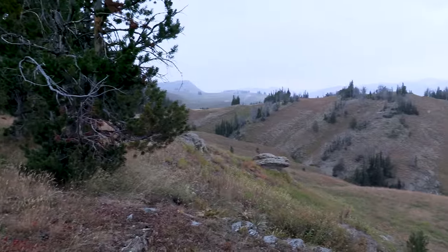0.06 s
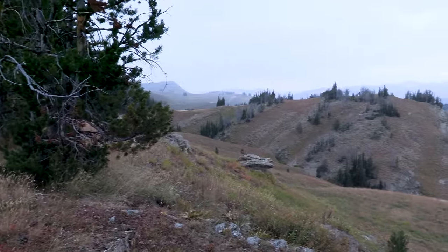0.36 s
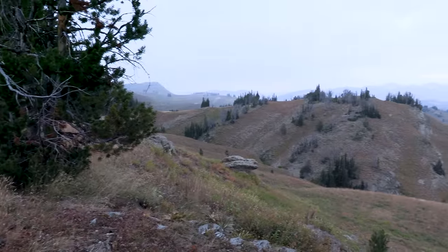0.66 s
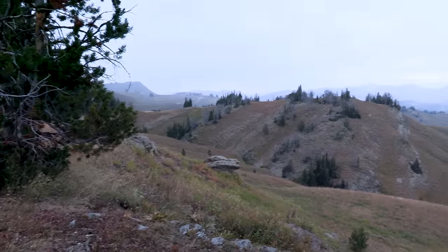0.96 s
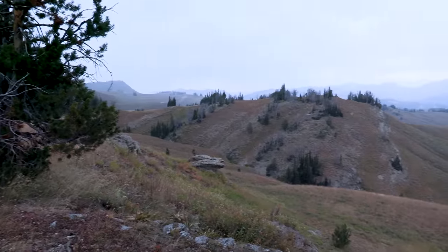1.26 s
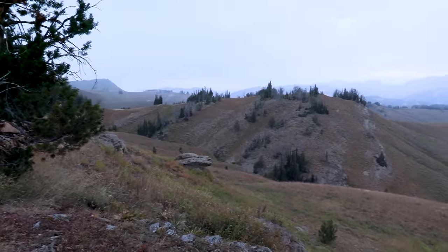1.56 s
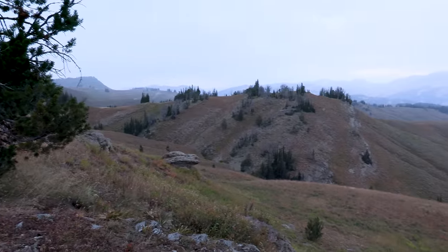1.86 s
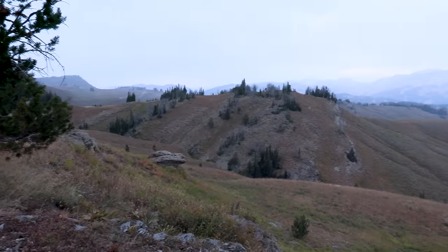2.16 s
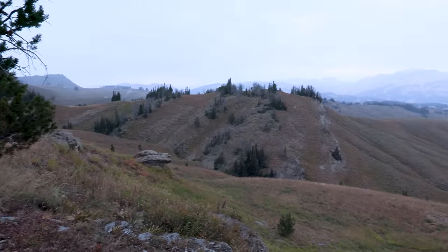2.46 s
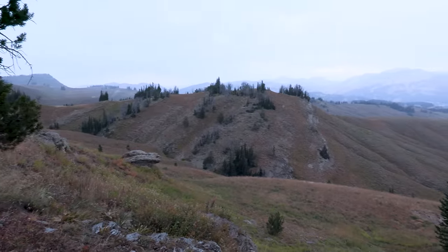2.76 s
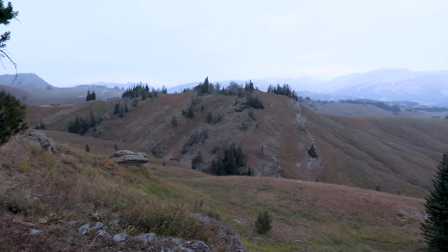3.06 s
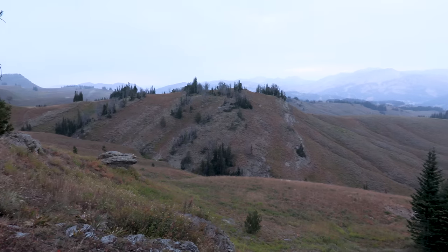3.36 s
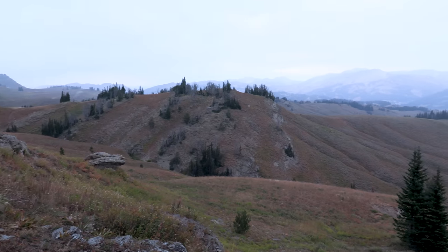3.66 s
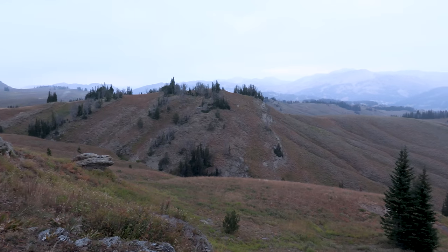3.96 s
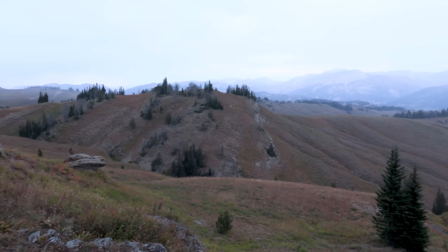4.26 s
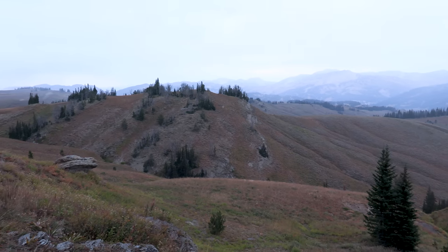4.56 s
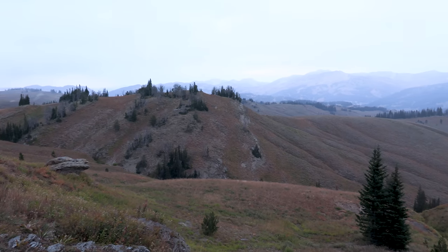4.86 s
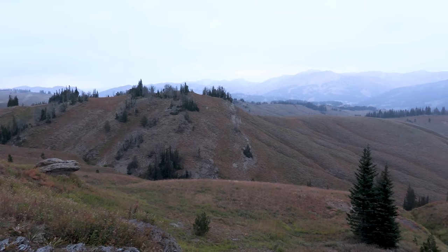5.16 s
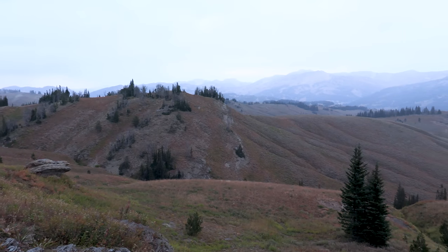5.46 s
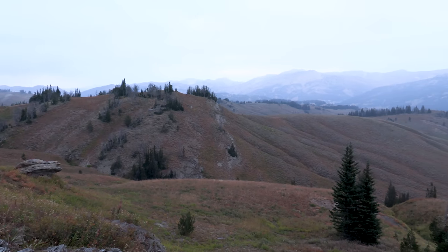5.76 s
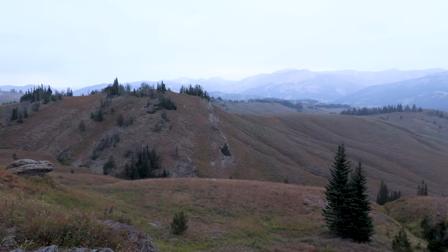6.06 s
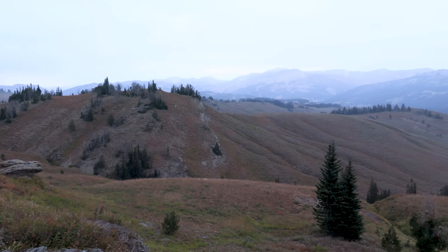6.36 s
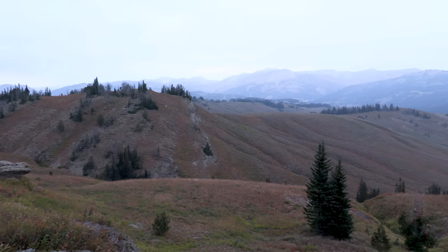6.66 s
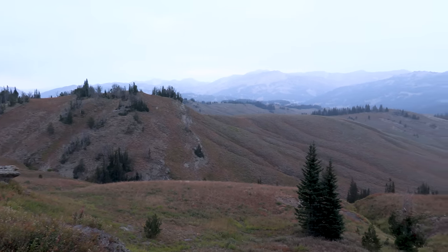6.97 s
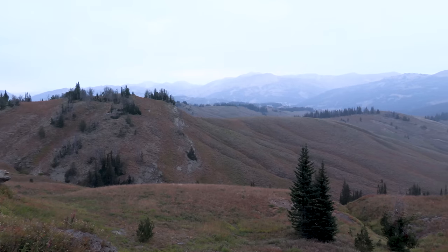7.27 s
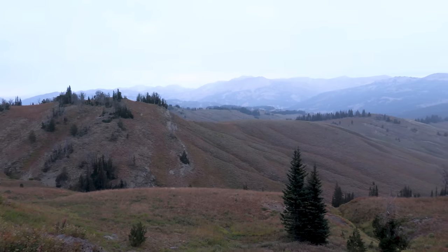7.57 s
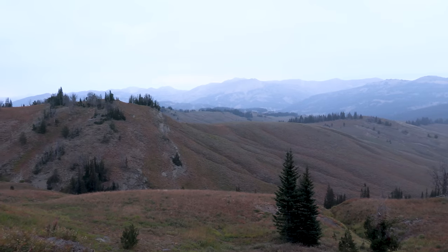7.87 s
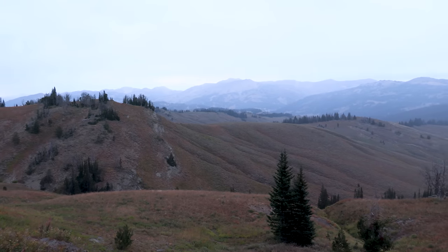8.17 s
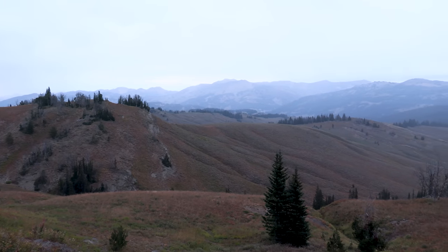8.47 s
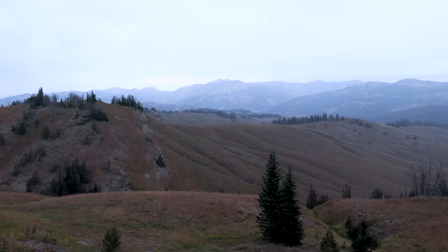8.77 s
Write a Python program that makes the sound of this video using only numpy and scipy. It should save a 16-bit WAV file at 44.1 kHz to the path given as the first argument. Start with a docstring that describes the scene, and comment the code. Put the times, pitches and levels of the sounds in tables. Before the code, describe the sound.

Light rain falls throughout, about nine seconds, on an open mountainside. Distant drops on grass merge into a soft wash, while many small, irregular ticks land on taut rainproof fabric close to the microphone. The rain eases slightly as it goes. A few wet, hollow splats stand out around 0.5 seconds and between 3 and 4.5 seconds. A soft low rush swells at about 0.6 seconds, then comes and goes faintly. At 2.2 seconds a drop hits the microphone housing with a bright ping, slightly to the right, and lighter taps follow near 3.6, 4.1 and 6.2 seconds. A small bird far away gives two very faint, short falling notes at about 5.2 and 7.3 seconds. The loudest sound is a sharp, thudding knock of a drop on the microphone at 8.1 seconds, toward the left, followed by another at 8.6 seconds.

```python
"""Steady light rain ticks on taut rainproof fabric, over a soft wash on an open mountainside.
Each near drop rings the fabric for a few cycles; countless far drops on the grass merge into the wash.
A few drops splat close by or hit the microphone's housing with a ping, a thud or a sharp knock.
The rain slowly eases. A soft low rush comes and goes, and a small bird calls far away."""
import sys
import numpy as np
from scipy import signal
from scipy.io import wavfile

SR = 44100
rng = np.random.default_rng(int(sys.argv[2]) if len(sys.argv) > 2 else 0)


def store_wav(level_fs):
    """Save 16-bit WAV to argv[1]."""
    pcm = np.round(np.clip(np.atleast_2d(level_fs), -1, 1) * 32767)
    wavfile.write(sys.argv[1], SR, pcm.T.astype(np.int16))


N = 392931

# rain strength, used relative to its mean: time_s, level_db
RAIN_STRENGTH = [(0.0, -51), (0.35, -52.5), (4.57, -55.5), (5.34, -55), (8.91, -57)]
# far rain spectrum: freq_hz, density_db
WASH_SPECTRUM = [(25, -23), (70, -19.5), (170, -8), (400, -5), (550, -1), (660, -2.5), (1000, -1),
                 (1600, -5), (2700, -6.5), (5000, -13), (8800, -20.5), (12000, -29.5), (14500, -38),
                 (16000, -47)]
# far rain likeness at the two ears: freq_hz, correlation
WASH_CORRELATION = [(50, 0.23), (130, 0.49), (300, 0.5), (520, 0.37), (700, 0.19), (1400, 0.17),
                    (3000, -0.064), (7000, 0.48), (14000, 1)]
# far rain balance (lean = left minus right): freq_hz, lean_db
WASH_LEAN = [(60, 0), (150, -1), (380, 0), (950, 0), (2380, 3), (5980, -0.5), (15000, 0)]
# low rush swells: time_s, level_db
RUSH_LEVEL = [(0.0, -63), (0.3, -62), (0.47, -70), (0.58, -52), (0.75, -51), (0.85, -55.5), (1.05, -56.5),
              (1.5, -68), (1.85, -62.5), (2.6, -65.5), (3.0, -64), (4.05, -69), (4.2, -61.5), (4.5, -65.5),
              (4.95, -57), (5.3, -63.5), (5.95, -60.5), (6.15, -66), (7.05, -58.5), (7.45, -66),
              (7.6, -60.5), (8.9, -74.5)]
# low rush spectrum before emphasis: freq_hz, density_db
RUSH_SPECTRUM = [(20, -40), (90, -33), (130, -18.5), (200, -3.5), (290, -1.5), (460, -1.5), (640, -11),
                 (1200, -41)]
# moving emphasis of the rush: time_s, centre_hz
RUSH_EMPHASIS = [(0.0, 460), (0.6, 450), (0.65, 310), (1.0, 340), (8.9, 322)]
# bird notes: start_s, length_s, start_hz, end_hz, level_db
BIRD_NOTES = [(5.24, 0.095, 3760, 3350, -67), (7.338, 0.08, 3610, 3230, -65.5)]
# small ringing drips: start_s, pitch_hz, level_db
RINGING_DRIPS = [(0.3362, 3650, -50), (0.3747, 3660, -50), (3.192, 6300, -53)]
# housing resonances in low, mid, high and top groups: freq_hz, width_hz, relative_db
HOUSING_MODES = ([(1330, 390, 0)], [(2170, 430, 0)], [(3050, 240, 3.5), (3710, 260, 2.5), (4350, 640, -5)],
                 [(5400, 470, 4), (5950, 650, 4)])
# drops on the housing: start_s, thud_db, thud_hz, thud_width_ratio, low_ring_db, mid_ring_db,
# high_ring_db, top_ring_db, spray_db, spray_top_hz, thud_lean_db, ring_lean_db
HOUSING_HITS = [(2.2118, -31, 248, 1.03, -54, -37.5, -40, -37.5, -37.5, 11700, -12, -6.5),
                (3.5839, -40, 225, 1.06, -43, -46, -67, -66, -69, 11000, -13, -6),
                (4.1061, -41.5, 280, 0.7, -52, -49, -58, -70, -75, 11000, -10.5, -8),
                (6.162, -37, 370, 0.8, -48, -40.5, -62, -66, -66, 13000, 19, 8),
                (8.083, -19, 200, 1.88, -28, -27.5, -29, -31.5, -39.5, 10900, 11, 11.5),
                (8.6124, -32, 190, 2.2, -27, -55, -26.5, -36, -41, 14500, 11, 8)]
# hollow splats close by: start_s, tick_db, pitch_hz, thud_db, snap_db, snap_hz, snap_width_hz,
# spray_db, spray_top_hz, lean_db
NEAR_SPLATS = [(0.4547, -37.5, 2000, -46, -28.5, 3830, 1010, -45.5, 15500, 0),
               (0.5866, -46, 2020, -52, -38.5, 3980, 1380, -54, 12500, -25),
               (0.648, -40.5, 2460, -52, -40, 4500, 1100, -56, 13000, -5),
               (3.0088, -38.5, 2140, -46.5, -37, 3970, 830, -48.5, 15500, 8),
               (3.5345, -35.5, 1540, -57, -37.5, 3070, 1150, -45, 10000, 6),
               (4.2602, -43, 1500, -56, -33, 3460, 1450, -54.5, 12100, -2),
               (4.685, -40, 1480, -55, -50, 3360, 920, -53.5, 12000, 2),
               (5.525, -42, 1750, -56, -50, 3700, 780, -47.5, 14500, 6),
               (6.6136, -46, 1150, -61, -44.5, 2120, 900, -60, 13000, -5)]
# big drops on fabric: start_s, tick_db, pitch_hz, width_ratio, snap_re_tick_db, spray_re_tick_db, lean_db
FABRIC_TICKS = [(0.0298, -39.5, 2200, 0.36, -14, -31, 14), (0.1488, -45, 1420.0, 0.67, -2.5, -16, 17),
                (0.3238, -41, 1820, 0.36, -27, -27, 12), (0.329, -40, 1500.0, 0.23, -19, -21, -4),
                (0.3353, -43.5, 1930.0, 0.44, -11, -19, -2), (0.375, -49, 1630, 0.48, -6, -9, 2),
                (0.406, -49, 2080.0, 0.38, -21, -22, 14), (0.4933, -53, 1030.0, 0.44, -14, -29, 4),
                (1.0062, -44.5, 1350, 0.25, -20, -30, 4), (1.0152, -48.5, 2280, 0.45, -21, -25, 2),
                (1.067, -47, 1410.0, 0.44, -9, -27, 8), (1.083, -48.5, 1450.0, 0.45, -22, -29, 2),
                (1.146, -52, 2200, 0.42, -20, -29, 2), (1.2472, -44.5, 1570.0, 0.47, -16, -29, 18),
                (1.2948, -47.5, 1000, 0.42, -20, -29, 7), (1.3725, -44.5, 2000, 0.28, -20, -25, 12),
                (1.4238, -37, 1240, 0.47, -27, -33, 0), (1.4329, -50, 2200.0, 0.36, -2, -5, 0),
                (1.7096, -42, 1650, 0.86, -18, -16, 2), (1.7594, -45.5, 1710.0, 0.74, -6, -17, 13),
                (1.881, -45, 1510.0, 0.48, -21, -28, 7), (1.9209, -34.5, 1670, 0.26, -33, -38, -2),
                (1.9401, -45, 1520.0, 0.23, -24, -31, 2), (1.9824, -49, 1660.0, 0.46, -12, -24, 11),
                (2.0037, -33, 1650, 0.44, -37, -37, 8), (2.0471, -44, 1850.0, 0.66, -21, -32, -5),
                (2.2902, -41.5, 1950.0, 1, -12, -24, 11), (2.3233, -46, 1610, 0.62, -22, -30, 3),
                (2.3456, -50, 1330.0, 0.48, -19, -28, 5), (2.4017, -53, 1900, 0.42, -20, -29, 3),
                (2.4672, -46, 1580.0, 0.27, -9, -20, 15), (2.5179, -48.5, 1690.0, 0.51, -10, -21, 11),
                (2.5452, -53, 2100, 0.42, -20, -29, 4), (2.5722, -52, 2100, 0.42, -20, -29, -9),
                (2.6076, -51.5, 1800, 0.42, -20, -29, 1), (2.7676, -38.5, 1200, 0.3, -25, -34, -5),
                (2.9803, -43.5, 1050.0, 0.43, -15, -26, 1), (3.209, -39.5, 1360, 0.28, -22, -33, 0),
                (3.3162, -46, 1250.0, 0.51, -22, -30, 5), (3.3784, -49, 1850.0, 0.48, -15, -29, -7),
                (3.4686, -43.5, 2470, 0.93, -18, -14, -2), (3.5901, -36.5, 1630.0, 0.36, -18, -25, 1),
                (3.6143, -50, 1420.0, 0.46, -23, -31, 6), (3.6558, -49, 2060, 0.14, -5, -30, 13),
                (3.6618, -48.5, 1580.0, 0.43, -18, -27, 6), (3.7625, -45, 1590.0, 0.7, -23, -33, 10),
                (3.9647, -44.5, 1920.0, 0.48, -6, -29, -5), (4.0131, -53, 1550.0, 0.46, -19, -31, 17),
                (4.0585, -41, 1550, 0.48, -20, -25, -3), (4.206, -48, 1510.0, 0.39, -24, -28, 5),
                (4.2264, -46, 1260.0, 0.52, -5, -31, 0), (4.2873, -49, 2180.0, 0.44, -19, -29, 12),
                (4.317, -44, 1320.0, 0.43, -25, -32, -1), (4.3252, -47.5, 1430.0, 0.44, -17, -29, 8),
                (4.3742, -50, 1920.0, 0.39, -3, -30, 7), (4.4599, -47.5, 2500, 0.36, -19, -23, 5),
                (4.5793, -49.5, 1680.0, 0.38, -0.5, -11, 0), (5.0355, -46, 1370, 0.18, -23, -28, 10),
                (5.065, -48, 1670.0, 0.59, -19, -29, -1), (5.1205, -45, 1240, 0.42, -22, -29, 1),
                (5.2154, -50, 1430.0, 0.45, -12, -20, 4), (5.2365, -52, 2500, 0.42, -18, -29, 13),
                (5.3536, -46, 1710.0, 0.25, -21, -28, 10), (5.3731, -44, 1690.0, 0.31, -25, -30, -2),
                (5.3878, -44, 1670.0, 0.19, -26, -31, -2), (5.4554, -42.5, 2120, 0.35, -16, -18, 14),
                (5.4754, -46.5, 1050, 0.34, -23, -30, -3), (5.498, -39.5, 1470.0, 0.55, -30, -36, 7),
                (5.777, -47.5, 1630.0, 0.58, -14, -31, 8), (5.7849, -44, 1320.0, 0.44, -26, -26, 8),
                (5.8818, -52.5, 1890.0, 0.4, -1, -5, -1), (5.894, -49.5, 940, 0.68, 0, -32, 10),
                (5.9965, -42.5, 915, 0.37, -9, -27, 7), (6.0373, -43.5, 1320, 0.37, -27, -32, -3),
                (6.0712, -46.5, 1610.0, 0.42, -25, -30, 12), (6.0857, -51, 1900.0, 0.41, -17, -27, 10),
                (6.1273, -49.5, 1290.0, 0.38, -6, -29, 11), (6.1926, -47, 1580.0, 0.42, -7, -27, 3),
                (6.3032, -40, 1460.0, 0.66, -28, -36, -1), (6.416, -54, 2500.0, 0.43, -19, -27, 4),
                (6.5484, -40, 1240, 0.38, -6.5, -36, 0), (6.7064, -47.5, 1620.0, 0.46, -4, -21, 5),
                (6.7705, -50, 1790.0, 0.35, -2.5, -32, 6), (6.9068, -50.5, 1620.0, 0.29, -24, -28, 0),
                (6.9126, -44.5, 1310, 0.66, -24, -33, -4), (7.062, -48.5, 1920.0, 0.5, -8, -27, 9),
                (7.079, -45, 1440.0, 0.97, -1, -23, -4), (7.0896, -48, 1160.0, 0.66, -4, -29, 11),
                (7.14, -43.5, 1140, 0.3, -14, -32, 7), (7.1952, -56, 1900.0, 0.49, -14, -29, 11),
                (7.2421, -54, 1460.0, 0.42, -4, -20, 7), (7.2484, -51, 1320.0, 0.45, -19, -30, 4),
                (7.3459, -42.5, 1330.0, 0.75, -9, -16.5, -3), (7.3626, -40, 1380.0, 0.26, -25, -33, 1),
                (7.389, -43.5, 1340.0, 0.42, -21, -34, 5), (7.5937, -43, 1190.0, 0.31, -26, -32, 1),
                (7.635, -50, 1500.0, 0.48, -25, -19, 2), (7.6413, -47.5, 1450.0, 0.45, -25, -28, -4),
                (7.6719, -46, 1600.0, 0.45, -27, -33, -3), (7.7697, -47.5, 1420.0, 0.46, -15, -27, -2),
                (7.7982, -54, 1650, 0.42, -20, -29, 14), (7.9729, -50, 1410.0, 0.47, -7, -29, 14),
                (8.04, -47, 1890.0, 0.37, -6, -14, 6), (8.0642, -46, 1640.0, 0.55, -6, -32, 11),
                (8.1203, -44.5, 1680.0, 0.46, -25, -25, 8), (8.1369, -47, 1690.0, 0.53, -19, -30, 1),
                (8.1527, -45.5, 1340.0, 0.39, -22, -30, -2), (8.2074, -48, 1940.0, 0.46, -22, -23, 7),
                (8.2503, -49, 1790.0, 0.29, -23, -29, -6), (8.3646, -43, 1600.0, 0.16, -30, -29, -1),
                (8.3855, -51, 1500, 0.25, -20, -29, -2), (8.4383, -49, 1380.0, 0.42, -19, -18, -9),
                (8.5073, -50.0, 1700, 0.42, -20, -29, -2), (8.5317, -44, 1530.0, 0.49, -22, -29, -1),
                (8.557, -54, 1750.0, 0.6, -5, -29, -3), (8.7078, -49, 1900, 0.58, -13, -31, -3),
                (8.7477, -47, 1380, 0.3, -12, -24, -1), (8.8235, -48.5, 1580.0, 0.41, -18, -29, 6),
                (8.885, -47.5, 1300.0, 0.46, -13, -30, -1)]

HIT_SAMPLES, HIT_RMS_S = 1024, .005
FABRIC_LOWPASS = signal.butter(3, 3000, fs=SR, output="ba")


def from_db(db):
    """Decibels to gain."""
    return 10 ** (np.asarray(db) / 20)


def unit_rms(x):
    """Scale to rms 1."""
    return x / np.sqrt(np.mean(x ** 2) + 1e-20)


def over_time(curve):
    """A (time_s, value) curve at every sample."""
    return np.interp(np.arange(N) / SR, *np.transpose(curve))


def at_hz(curve, hz):
    """A (freq_hz, value) curve read on a log axis."""
    freqs_hz, values = np.transpose(curve)
    return np.interp(np.log(hz), np.log(freqs_hz), values)


def pan(lean_db):
    """Constant-power left and right gains."""
    return unit_rms(from_db([[lean_db / 2], [-lean_db / 2]]))


def off_centre(x, lean_db, lag_s):
    """The far ear gets the sound weaker and later."""
    t = np.arange(x.shape[1]) / SR
    is_far = (lean_db < 0, lean_db > 0)
    ears = [np.interp(t - lag_s * far, t, ear, left=0) for ear, far in zip(x, is_far)]
    return pan(lean_db) * np.array(ears)


def drift(rate_hz):
    """Slow random curve, rms 1."""
    knots = rng.standard_normal(int(N / SR * rate_hz) + 2)
    return unit_rms(np.interp(np.arange(N) / SR * rate_hz, np.arange(len(knots)), knots))


def resonate(x, hz, width_hz):
    """Two-pole resonance, peak gain 1."""
    r, w = np.exp(-np.pi * width_hz / SR), 2 * np.pi * hz / SR
    return signal.lfilter(np.array([1, 0, -1]) * (1 - r * r) / 2, [1, -2 * r * np.cos(w), r * r], x)


def lowpass(x, hz):
    """One-pole low-pass."""
    r = np.exp(-2 * np.pi * hz / SR)
    return signal.lfilter([1 - r], [1, -r], x)


def at_level(hit, db):
    """Scale a hit to the energy of HIT_RMS_S at an rms of db."""
    return from_db(db) * unit_rms(hit) * np.sqrt(HIT_RMS_S * SR / HIT_SAMPLES)


def add(out, start_s, sound):
    """Mix in a stereo sound."""
    start = int(np.clip(start_s * SR, 0, N - 1))
    out[:, start:start + sound.shape[1]] += sound[:, :N - start]


def noise_bands(spectrum, correlation, edges_hz, flicker_db):
    """Yield (centre_hz, stereo noise); each band flickers on its own."""
    white = rng.standard_normal((2, 2, N))
    for k, (low_hz, high_hz) in enumerate(zip(edges_hz, edges_hz[1:])):
        bandpass = signal.butter(2, [low_hz, high_hz], "band", fs=SR, output="sos")
        mid, side = signal.sosfilt(bandpass, white[k % 2])
        hz = np.sqrt(low_hz * high_hz)
        alike = np.clip(at_hz(correlation, hz), -.95, .95)
        ears = np.sqrt(1 + alike) * mid + np.sqrt(1 - alike) * side * [[1], [-1]]
        yield hz, ears * from_db(at_hz(spectrum, hz) + flicker_db * drift(rate_hz=20))


def far_rain(wash_db, hiss_db):
    """Drops on the whole slope merge into a wash and a hiss."""
    edges_hz = np.geomspace(20, 17000, 27)
    wash, hiss = 0, 0
    for hz, band in noise_bands(WASH_SPECTRUM, WASH_CORRELATION, edges_hz, flicker_db=0.68):
        band = band * pan(at_hz(WASH_LEAN, hz))
        if hz < 2500:
            wash += band
        else:
            hiss += band
    return from_db(wash_db) * unit_rms(wash) + from_db(hiss_db) * unit_rms(hiss)


def low_rush(falloff_db_per_octave=3.5):
    """A dull, nearly mono rush comes and goes and shifts in pitch."""
    edges_hz = np.geomspace(80, 1200, 14)
    centre_hz = over_time(RUSH_EMPHASIS)
    rush = 0
    for hz, band in noise_bands(RUSH_SPECTRUM, [(100, 0.91), (400, 1.0)], edges_hz, flicker_db=1.2):
        rush += band * from_db(-falloff_db_per_octave * np.abs(np.log2(hz / centre_hz)))
    return from_db(over_time(RUSH_LEVEL)) * unit_rms(rush)


def far_bird(echo_decay_s=0.056, echo_db=0.5):
    """Thin falling notes, blurred by many small echoes off the slope."""
    out, t = np.zeros((2, N)), np.arange(SR // 2) / SR
    for start_s, length_s, start_hz, end_hz, level_db in BIRD_NOTES:
        samples = int(length_s * SR)
        phase = 2 * np.pi * np.cumsum(np.linspace(start_hz, end_hz, samples)) / SR
        note = from_db(level_db) * unit_rms(np.hanning(samples) ** .5 * np.sin(phase))
        echoes = rng.standard_normal((2, len(t))) * np.sqrt(t) * np.exp(-t / echo_decay_s)
        echoes = from_db(echo_db) * unit_rms(echoes) / np.sqrt(len(t))
        add(out, start_s, pan(0) * note)
        add(out, start_s, signal.fftconvolve(echoes, note[None]))
    return out


def impact(scatter_db, decay_s, lag_s, build_s=0.00081):
    """One clean push, a little apart at the ears, then a dying scatter of droplets and reflections."""
    t = np.arange(HIT_SAMPLES) / SR
    skew_s = rng.uniform(-1.52, 1) * lag_s
    delay_s = np.maximum([[skew_s], [-skew_s]], 0)
    push = np.sinc((t - delay_s) * SR - 4)
    envelope = np.exp(-t / decay_s) * (1 - np.exp(-(t / build_s) ** 2))
    scatter = rng.standard_normal((2, HIT_SAMPLES)) * envelope
    return push + from_db(scatter_db) * unit_rms(scatter) / np.sqrt(HIT_SAMPLES)


def spray(push, top_hz):
    """Bright crack of a bursting drop; finer spray reaches higher."""
    crack = resonate(resonate(push, 8150, 3300), 9800, 8200)
    return signal.lfilter(*signal.butter(3, top_hz, fs=SR), crack)


def drips():
    """Each drip rings for some tens of cycles."""
    out = np.zeros((2, N))
    for start_s, pitch_hz, level_db in RINGING_DRIPS:
        push = impact(scatter_db=-2, decay_s=0.002, lag_s=.00003)
        add(out, start_s, at_level(resonate(push, pitch_hz, width_hz=130), level_db))
    return out


def housing_knocks(shudder_db=-21.5, shudder_decay_s=0.011):
    """A drop thumps the nearer port and rings the shell; the spot hit decides which modes speak."""
    out, t = np.zeros((2, N)), np.arange(HIT_SAMPLES) / SR
    for hit in HOUSING_HITS:
        start_s, thud_db, thud_hz, width_ratio, *rings_db, spray_db, top_hz, thud_lean_db, lean_db = hit
        push = impact(scatter_db=-10.5, decay_s=0.00094, lag_s=.00001)
        force = lowpass(lowpass(push, 8800), 8800)
        shell = 0
        for modes, ring_db in zip(HOUSING_MODES, rings_db):
            ring = sum(from_db(db) * resonate(force, hz, width_hz) for hz, width_hz, db in modes)
            shell += at_level(ring, ring_db)
        shell = off_centre(shell, lean_db, lag_s=0.00024)
        shudder = rng.standard_normal((2, HIT_SAMPLES)) * np.exp(-t / shudder_decay_s)
        shove = push + from_db(shudder_db) * unit_rms(shudder) / np.sqrt(HIT_SAMPLES)
        thud = resonate(shove, thud_hz, width_ratio * thud_hz)
        thud = lowpass(resonate(thud, thud_hz, 2.6 * width_ratio * thud_hz), 1200)
        thud = off_centre(at_level(thud, thud_db), thud_lean_db, lag_s=0.00074)
        crack = pan(0.25 * lean_db) * at_level(spray(push, top_hz), spray_db)
        add(out, start_s, shell + crack - thud)
    return out


def fabric_drop(tick_db, pitch_hz, thud_db, snap_db, snap_hz, snap_width_hz,
                spray_db, top_hz, lean_db, width_ratio, thud_hz=296):
    """The fabric snaps, rings for a few cycles where it is hit, and gives a little as a whole."""
    push = impact(scatter_db=-8, decay_s=0.0025, lag_s=.00005)
    ring = resonate(resonate(push, pitch_hz, width_ratio * pitch_hz), pitch_hz, 3.1 * pitch_hz)
    tick = signal.lfilter(*FABRIC_LOWPASS, lowpass(ring, 1900))
    snap = lowpass(resonate(resonate(push, snap_hz, snap_width_hz), snap_hz, 3200), 3400)
    thud = lowpass(resonate(resonate(push, thud_hz, 470), .5 * thud_hz, 1120), 1100)
    crack = spray(push.mean(axis=0), top_hz)
    body = at_level(tick, tick_db) - at_level(snap, snap_db)
    return pan(lean_db) * body + at_level(crack, spray_db) - at_level(thud, thud_db)


def dull_tick(tick_db, pitch_hz, width_ratio, snap_re_tick_db, spray_re_tick_db, lean_db):
    """A fabric drop, mostly tick; thud, snap and spray follow its level."""
    return fabric_drop(tick_db, pitch_hz, thud_db=tick_db - 16.5,
                       snap_db=tick_db + snap_re_tick_db, snap_hz=3330, snap_width_hz=1200,
                       spray_db=tick_db + spray_re_tick_db, top_hz=12000,
                       lean_db=lean_db, width_ratio=width_ratio)


def patter(rain_db, drops_per_s=80, centre_hz=1564, spread_octaves=0.47):
    """Small drops at random times; most are faint, a few stand out."""
    out, count = np.zeros((2, N)), int(drops_per_s * N / SR)
    for (when, faintness), (tone, wet, side) in zip(rng.random((count, 2)),
                                                    rng.standard_normal((count, 3))):
        tick_db = -49.5 - 9 * faintness ** 0.39 + rain_db[int(when * N)]
        pitch_hz = np.clip(centre_hz * 2 ** (spread_octaves * tone), 700, 3000)
        splash_db = -16 + 3.5 * wet   # a wet spot sounds brighter
        tick = dull_tick(tick_db, pitch_hz, width_ratio=0.37, snap_re_tick_db=splash_db,
                         spray_re_tick_db=splash_db - 5.5, lean_db=5.5 + 7 * side)
        add(out, when * N / SR, tick)
    return out


def port_ring(x):
    """Two narrow hollow resonances colour the rain: one in phase at the ears, one opposed."""
    alike = from_db(-2) * resonate((x[0] + x[1]) / 2, hz=543, width_hz=28)
    opposed = from_db(7.5) * resonate((x[0] - x[1]) / 2, hz=867, width_hz=55)
    return x + alike + opposed * [[1], [-1]]


def big_drops():
    """Near drops tick on the fabric or burst with a sharp, hollow splat."""
    out = np.zeros((2, N))
    for start_s, *tick in FABRIC_TICKS:
        add(out, start_s, dull_tick(*tick))
    for start_s, *splat in NEAR_SPLATS:
        add(out, start_s, fabric_drop(*splat, width_ratio=0.24))
    return out


def scene():
    """Easing wash and patter, plus big drops, rush, knocks, drips and bird."""
    rain_db = over_time(RAIN_STRENGTH)
    rain_db -= rain_db.mean()
    wash = far_rain(wash_db=-53 + rain_db, hiss_db=-59.5 + 0.68 * rain_db)
    fine_rain = port_ring(wash + patter(rain_db))
    return fine_rain + big_drops() + low_rush() + housing_knocks() + drips() + far_bird()


def record(dry):
    """Steep treble cut."""
    cutoff_hz = 15700
    return signal.sosfilt(signal.ellip(10, .1, 70, cutoff_hz, fs=SR, output="sos"), dry)


dry = scene()
out = record(dry)
store_wav(out)
```